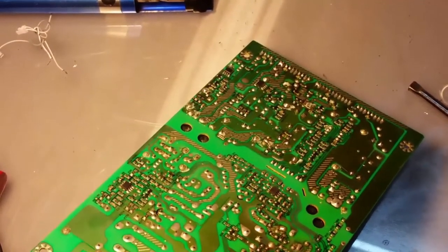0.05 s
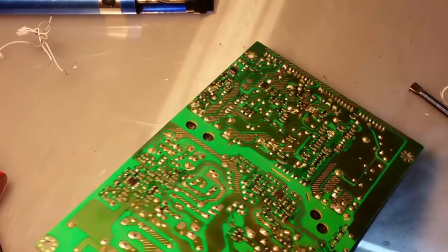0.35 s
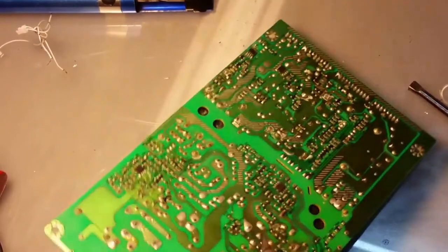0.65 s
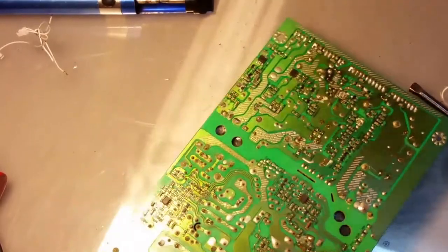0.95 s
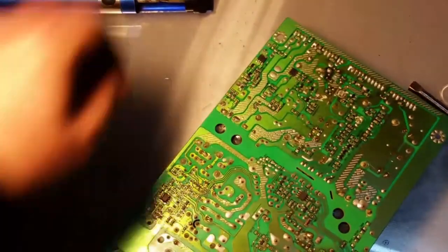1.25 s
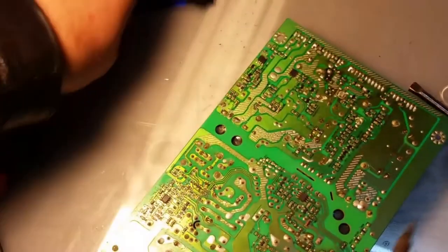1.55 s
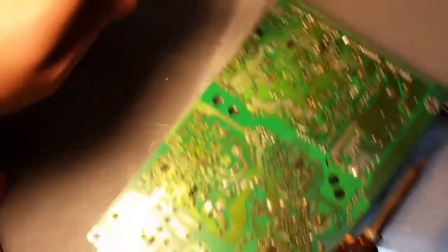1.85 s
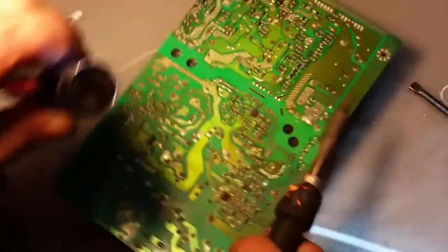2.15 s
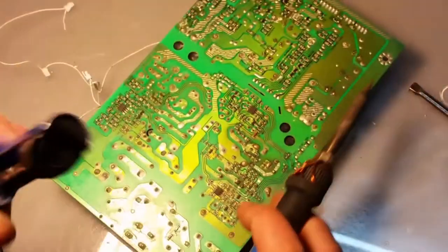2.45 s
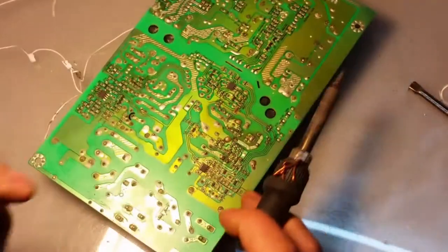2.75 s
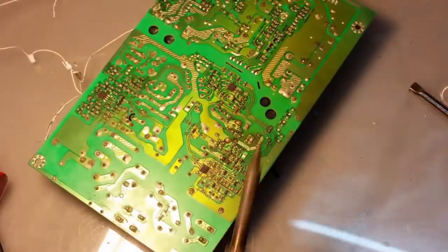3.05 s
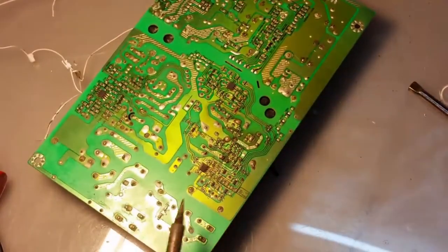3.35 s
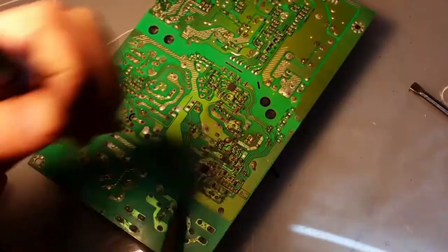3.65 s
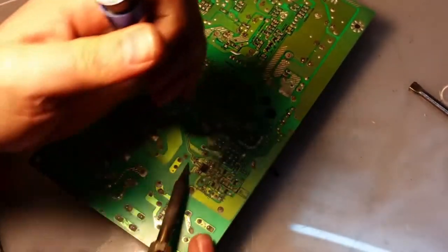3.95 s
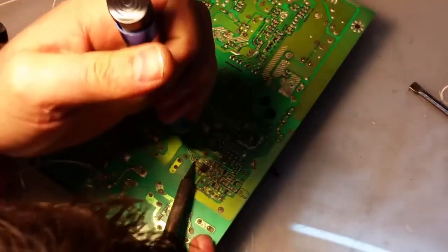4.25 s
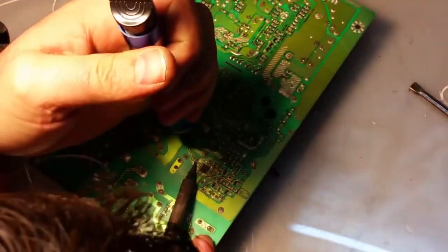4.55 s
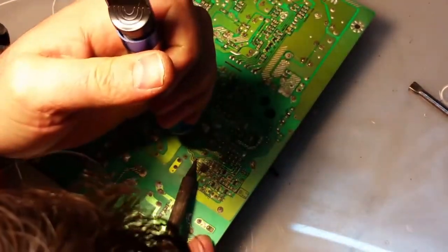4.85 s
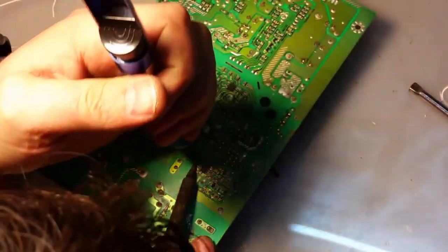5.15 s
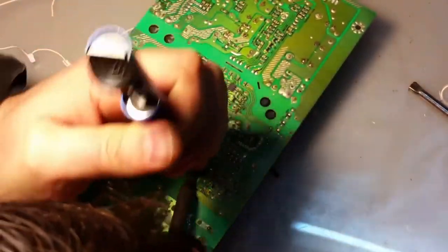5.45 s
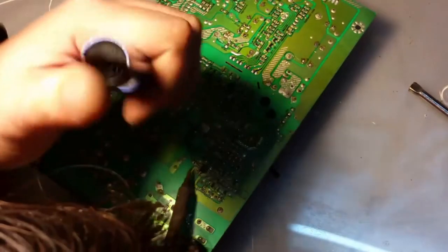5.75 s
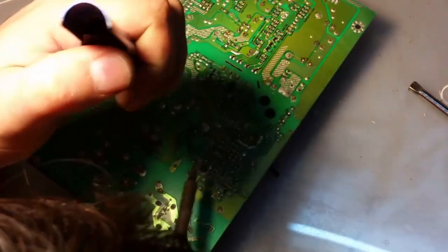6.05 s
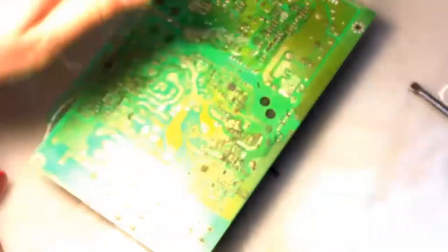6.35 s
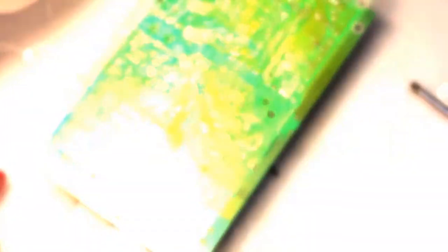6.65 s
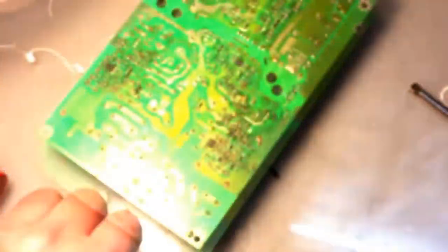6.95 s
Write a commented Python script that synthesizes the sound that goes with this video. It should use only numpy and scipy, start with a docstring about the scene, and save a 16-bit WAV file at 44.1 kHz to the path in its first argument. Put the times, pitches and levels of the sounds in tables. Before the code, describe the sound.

Close up in a small, faintly echoing room, a circuit board is shifted on a bench: light knocks, one loud clatter, more bumps and a juddering drag. Then come crisp metal and plastic clicks from soldering tools, a lull with tiny taps, a quick rattling flurry and a few last snaps. A soft hum and a thin hiss on the left run underneath until everything suddenly dips just before the end.

```python
"""Circuit board on a workbench

A circuit board rocks and drops onto a bench, each impact exciting the damped modes of both. Dragged
round, it scrapes and groans by stick-slip friction. A soldering iron and a desoldering pump tick and
snap against it. A small room reverberates faintly, over a low hum and hiss mainly on the left;
near the end the whole sound dips."""
import sys
import numpy as np
from scipy import signal
from scipy.fft import rfft, irfft, next_fast_len
from scipy.io import wavfile
from scipy.ndimage import uniform_filter1d

SR = 44100
rng = np.random.default_rng(int(sys.argv[2]) if len(sys.argv) > 2 else 0)


def store_pcm(level_fs):
    """Save levels as 16-bit WAV."""
    pcm = np.round(np.clip(level_fs, -1, 1) * 32767).astype(np.int16)
    wavfile.write(sys.argv[1], SR, np.atleast_2d(pcm).T)


N = 318160
TIME = np.arange(N) / SR
AGE = np.arange(SR // 5) / SR  # time since an impact [s]

# rumble and hum together: (time [s], level [dB])
ROOM_LEVEL = [(0, -48.5), (2, -48.5), (3.5, -46.5), (4.6, -51), (5.1, -48.5), (5.8, -46), (6.3, -51.5),
              (6.7, -47.5)]
# tool tip on the board: (time [s], level [dB], main mode [Hz], contact cutoff [Hz])
TOOL_TAPS = [(0.359, -56, 824, 1500), (0.573, -43.5, 965, 1490), (.934, -45, 920, 1210),
             (1.566, -46.5, 1150, 1500), (1.852, -31.5, 1185, 1460), (2.61, -60, 706, 1200),
             (4.061, -44.5, 1485, 1991), (4.283, -57.5, 1480, 1800), (4.462, -54, 1465, 1811),
             (5.699, -37, 1040, 2400), (5.7813, -45, 1070, 2200), (5.794, -52, 1110, 2800)]
# hands and tools brushing the bench: (time [s], level [dB])
BRUSH_LEVEL = [(0, -80.5), (.7, -57.5), (3.3, -60), (4.3, -67.5), (5.3, -83), (5.8, -65), (7.2, -67)]
# board pushed over the bench: (start [s], length [s], level [dB])
BOARD_PUSHES = [(.51, 0.024, -48.5), (1.0, 0.088, -39.5), (1.2, 0.031, -46), (1.43, 0.094, -50),
                (1.86, 0.042, -40.5), (2.0, 0.16, -49.5), (2.61, 0.19, -53), (3.1, 0.066, -45.5)]
# board striking the bench: (time [s], level [dB], contact cutoff [Hz], bench thud [dB],
# rebound gap [s], decay time relative to the free board [ratio])
BOARD_KNOCKS = [(0.5154, -30, 980, -37.5, 0.011, 0.59), (0.572, -37.5, 1460, -53, 0.0018, 0.63),
                (0.623, -44.5, 600, -40.5, 0.02, 0.85), (0.74, -34.5, 1040, -47, 0.00017, 0.92),
                (0.8041, -39, 950, -44, 0, .6), (0.8381, -35, 940, -43, 0.0023, 0.68),
                (0.894, -46, 1240, -48, 0.00026, 0.63), (0.9335, -36.5, 950, -61, 0.00031, 0.5),
                (0.9983, -16.5, 1440, -33, 0.00041, 1.06), (1.0099, -16.5, 1550, -26.5, 0.00029, .9),
                (1.0282, -22.5, 1200, -25, 0.00038, 0.49), (1.054, -27, 1520, -39, 0.01, 0.73),
                (1.0953, -26, 1300, -38, 0.0006, 0.54), (1.131, -40.5, 800, -48, 0, .5),
                (1.169, -32.5, 1198, -44, 0.00014, .5), (1.414, -37, 375, -66, 0.0013, 0.69),
                (1.4255, -29, 595, -43, 0.00074, 1.13), (1.4482, -34, 520, -40, 0.012, 0.84),
                (1.5564, -38, 623, -34, 0.0088, 0.42), (1.7044, -38.5, 476, -52, 0.0017, 0.62),
                (1.8439, -34.5, 1413, -45, 0.00094, 0.88), (1.865, -25.5, 849.6, -29.5, 0.0019, 0.93),
                (1.887, -35, 950, -32.5, 0, .8), (3.1027, -30, 520, -38.5, 0.00015, 0.52),
                (5.4596, -35, 900, -41, 0.002, .25), (5.4787, -38, 1699, -38.5, 0.00048, .3),
                (5.6079, -42.5, 700, -38.5, 0.00086, 0.71), (6.4054, -36, 1199, -43.5, 0, 0.22)]
# one gritty rub, then two faint high hisses that each swell up to a snap:
# (start [s], end [s], final level [dB], centre [Hz], bandwidth [Hz])
NOISE_SWELLS = [(0.954, 1.018, -44.5, 1390, 400), (3.206, 3.333, -54.5, 12650, 5500),
                (5.913, 6.041, -52.5, 12800, 5500)]
# metal and plastic snaps: (time [s], level [dB], rattle t60 [s], rebound gap [s],
# body relative to treble [dB], main mode [Hz], relative ring level [dB])
TOOL_SNAPS = [(.9979, -32, 0.064, 0.015, 4, 3500, -6), (1.0279, -34, .07, 0.000059, 4, 3400, -16),
              (1.057, -38, 0.15, 0.00033, 6.5, 3060, -10), (1.1934, -41.5, 0.12, 0.01, 3, 3380, -12),
              (1.851, -47, 0.072, 0.014, 2, 3487, 0.5), (3.1485, -37, 0.045, 0, 0.5, 3550, -12),
              (3.3383, -20.5, 0.013, 0, 0.5, 3250, -14), (3.4275, -37, 0.023, 0.0009, 11.5, 3500, -23),
              (5.466, -31.5, 0.067, 0.00023, -4.5, 3720, -16.5), (5.4715, -22, 0.032, 0, -1.5, 3470, -24),
              (5.4783, -30, 0.045, 0, 4.5, 3770, -23), (5.4875, -28, 0.068, 0, 3.5, 4600, -24),
              (5.518, -32, 0.024, 0.0041, 2.5, 3450, -25.5),
              (5.6682, -38, 0.024, 0.0036, -3.5, 3470, -15.5), (5.7698, -34, 0.052, 0.0019, 2.5, 3460, -14),
              (5.796, -42, 0.032, 0, 9.5, 3093, -15), (5.83, -42.5, 0.034, 0.00037, 3, 3540, -15),
              (5.844, -30, 0.045, 0, 1.5, 3476, -22.5), (6.0434, -17, 0.013, 0, 1, 3694, -14.5),
              (6.1348, -40, 0.046, 0.0016, 10, 3496, -8), (6.3963, -23.5, 0.067, 0.0012, -5, 3621, -22),
              (6.407, -25, 0.051, 0.0034, 5, 3504, -23)]
# hand landing on bench or board: (start [s], length [s], level [dB])
HAND_SCUFFS = [(1.866, .015, -41), (3.105, .06, -37), (3.19, .16, -51), (5.479, .012, -43.5),
               (6.407, .008, -39.5), (6.45, 0.043, -52)]
# board's edge sliding without catching: (start [s], length [s], level [dB])
EDGE_SLIDES = [(1.99, .13, -46), (2.13, 0.11, -43), (2.6, 0.22, -48.5)]
# board's edge gripping: (start [s], length [s], level [dB], slip rate [Hz], relative grit level [dB])
EDGE_GRIPS = [(2.116, 0.018, -40, 392, -12), (2.154, 0.02, -31.5, 386.4, -16),
              (2.185, 0.011, -30, 404, -17.5), (2.212, 0.036, -37.5, 397.1, -19.5),
              (2.691, 0.035, -33.5, 393.2, -28), (2.738, 0.027, -37, 383.3, -26),
              (2.777, 0.034, -34.5, 395.2, -32)]

# modes of the free board, bench top and thin metal parts: (frequency [Hz], gain [dB], t60 [s])
BOARD_MODES = [(170, -18, 0.04), (233, -4, 0.087), (269, -7, 0.04), (305, -6, 0.15), (392, -10.5, 0.07),
               (427, -1.5, 0.06), (497, 3, 0.056), (590, -9.5, .045), (677, -10, 0.053), (745, -16, 0.06),
               (890, -19.5, 0.03), (1130, -8.5, 0.035), (1350, -26, 0.017), (1720, -22, 0.03)]
BENCH_MODES = [(48, -14.5, 0.1), (80.1, -2.5, 0.21), (102, -7.5, 0.11), (123, -6, 0.15), (160, -13, 0.1)]
METAL_MODES = [(9730, -6.5, .16), (13297, -1, .13), (13620, -2, .13), (13944, 0.5, .13)]
# modes of the tapped board and tool bodies: (frequency over main mode [ratio], gain [dB], t60 [s])
TAP_MODES = [(.56, -9, 0.014), (.74, -11, .012), (1, -2, 0.018), (1.15, -11.5, 0.012), (1.55, -9.5, 0.007)]
TOOL_MODES = [(.7, -11, .03), (.87, -8.5, 0.032), (.95, -7, 0.03), (1.01, 0.5, 0.024), (1.14, -3, .018)]

# spectral envelopes of the noises: (frequency [Hz], gain [dB])
RUMBLE_SPECTRUM = [(15, -16.5), (28, -12), (43, -8.5), (57, -4.5), (76, 2.5), (100, -4.5), (135, -6),
                   (165, -20), (240, -15.5), (420, -26.5), (700, -33.5), (1200, -40), (1520, -32),
                   (2100, -43), (16000, -64)]
HISS_SPECTRUM = [(2000, -35), (2750, -24), (3030, -10.5), (3300, 1), (3700, 2.5), (4200, -2.5), (4700, -12),
                 (5300, -32), (6600, -46), (7300, -21.5), (7800, -20.5), (9000, -34.5), (10400, -49.5),
                 (11500, -23.5), (13200, -34.5), (16000, -50.5)]
SCRAPE_SPECTRUM = [(60, -16), (150, -11.5), (280, 0), (450, -3.5), (650, -12), (1150, -16), (1800, -27.5),
                   (3000, -27.5), (8000, -46.5), (12500, -29), (16000, -63.5)]
CHATTER_SPECTRUM = [(60, -36.5), (200, 0), (450, 3.5), (800, -4.5), (1150, -10), (1700, -13.5),
                    (2500, -16.5), (5000, -12), (16000, -44)]
SNAP_SPECTRUM = [(150, -18.5), (400, -8.5), (900, -8), (3400, -9), (8000, -9.5), (10500, 0), (12500, 2),
                 (13800, 11.5), (16000, -7)]
SCUFF_SPECTRUM = [(50, -12), (110, 3.5), (340, 2), (470, -11), (620, -7), (1300, -32.5), (4000, -52.5)]
EDGE_SPECTRUM = [(150, -35), (330, -3), (400, 1.5), (455, 0.5), (540, -22), (1150, -23), (1400, -33),
                 (4000, -49.5)]
GRIT_SPECTRUM = [(300, -10), (680, 9), (1100, 8), (1350, -17), (1900, -11), (4000, -18), (16000, -56)]


def undb(db):
    """Amplitude ratio of a level in decibels."""
    return 10 ** (np.asarray(db) / 20)


def unit(x):
    """Normalisation to unit rms."""
    return x / np.sqrt(np.mean(x ** 2) + 1e-18)


def unit_onset(x, seconds):
    """Normalisation to unit rms over the start of a transient."""
    return x / np.sqrt(np.mean(x[:int(seconds * SR)] ** 2))


def envelope(rows):
    """Amplitude from linear interpolation of (time, level) rows."""
    return undb(np.interp(TIME, *np.transpose(rows)))


def colour(x, spectrum):
    """Minimum-phase filtering: folding the cepstrum makes the response causal."""
    size = next_fast_len(x.shape[-1] + 2048)
    size += size % 2
    hz, db = np.transpose(spectrum)
    bin_hz = np.arange(size // 2 + 1) * SR / size
    cepstrum = irfft(np.log(undb(np.interp(np.log(bin_hz + 1), np.log(hz), db))))
    cepstrum[1:size // 2] *= 2
    cepstrum[size // 2 + 1:] = 0
    return irfft(rfft(x, size) * np.exp(rfft(cepstrum)))[..., :x.shape[-1]]


def lowpass(x, hz, order=2):
    """Maximally flat low-pass filtering."""
    return signal.sosfilt(signal.butter(order, hz, fs=SR, output="sos"), x)


def noise(spectrum):
    """Spectrally shaped noise of unit rms."""
    return unit(colour(rng.standard_normal(N), spectrum))


def wander(rate_hz):
    """Smooth random modulation of unit rms."""
    hold = int(SR / rate_hz)
    steps = np.repeat(rng.standard_normal(N // hold + 1), hold)
    return unit(uniform_filter1d(steps, hold)[:N])


def decay(t60):
    """Exponential damping, 60 dB in t60 seconds."""
    return np.exp(-np.log(1000) * AGE / t60)


def ring(modes, scatter_db, detune):
    """Modal superposition: each blow lands elsewhere and weights the damped modes anew."""
    draws = rng.standard_normal((len(modes), 2))
    return sum((-1) ** k * undb(db + scatter_db * a) * decay(t60)
               * np.sin(2 * np.pi * hz * (1 + detune * b) * AGE)
               for k, ((hz, db, t60), (a, b)) in enumerate(zip(modes, draws)))


def bounces(start, gap, loss_db=-6, shrink=0.76):
    """Inelastic collision, as (time, level): a gap over 3 ms gives two ever weaker, quicker rebounds."""
    if gap <= 0.003:
        return [(start, 0)]
    return [(start, 0), (start + gap, loss_db), (start + gap + gap * shrink, 2 * loss_db)]


def strokes(rows, attack_s, release_s):
    """Exponential envelopes: each stroke swells up to its start, holds and dies away."""
    return np.max([undb(db) * np.exp(np.minimum(TIME - start, 0) / attack_s
                                     - np.maximum(TIME - start - length, 0) / release_s)
                   for start, length, db in rows], axis=0)


def add(track, start, x):
    """Superposition of an event on a track."""
    i = int(start * SR)
    track[i:i + len(x)] += x[:N - i]


def place(x, left_db, room_db, t60, bright_hz):
    """Direct sound plus a diffuse field, which is more alike in both channels in the bass."""
    t = np.arange(2 * len(AGE)) / SR
    tail = rng.standard_normal((2, len(t))) * np.exp(-np.log(1000) * t / t60) * (1 - np.exp(-t / 0.0021))
    tail += lowpass(tail[::-1] - tail, 200, order=1) / 2
    tail /= np.sqrt(np.sum(tail ** 2, axis=1, keepdims=True))
    diffuse = signal.fftconvolve(x[None], lowpass(tail, bright_hz, order=1), axes=1)[:, :N]
    return (x + undb(room_db) * diffuse) * undb([[left_db / 2], [-left_db / 2]])


def room_tone():
    """Ambient rumble, coherent between the channels in the bass, with two wavering hum tones."""
    mid, side = noise(RUMBLE_SPECTRUM), noise(RUMBLE_SPECTRUM)
    side = signal.sosfilt(signal.butter(1, 400, "high", fs=SR, output="sos"), side)
    hum = np.sin(2 * np.pi * np.cumsum(43 + 1.1 * wander(13)) / SR) * undb(-2.5 + 2 * wander(2.4))
    hum += undb(-15) * np.sin(2 * np.pi * np.cumsum(139 + 2 * wander(8)) / SR)
    return unit(np.array([mid + side, mid - side]) + hum) * envelope(ROOM_LEVEL)


def electronic_hiss():
    """Electronic noise: a band mainly in the left channel, above a flat floor."""
    band = noise(HISS_SPECTRUM) * undb([[-46], [-70]])
    floor = undb(-76) * rng.standard_normal((2, N))
    return lowpass(band + floor, 12550, order=12)


def taps():
    """Point excitation by a tool tip: the spot sets the board's modes, the contact their brightness."""
    out = np.zeros(N)
    for start, db, main_hz, contact_hz in TOOL_TAPS:
        modes = [(main_hz * ratio, gain_db, t60) for ratio, gain_db, t60 in TAP_MODES]
        clack = unit_onset(rng.standard_normal(len(AGE)) * decay(0.0065), 0.0033)
        ringing = unit_onset(ring(modes, scatter_db=2.5, detune=0.011), 0.0069)
        tap = lowpass(ringing + undb(4) * clack, contact_hz, order=5)
        add(out, start, undb(db) * unit_onset(tap, 0.004))
    return place(out, left_db=1, room_db=-4, t60=0.14, bright_hz=5040)


def scrape():
    """Sliding friction: the board scrapes unevenly at each push; hands brush faintly in between."""
    grains = rng.standard_normal(N) * undb(4.4 * wander(70))
    pushes = strokes(BOARD_PUSHES, attack_s=0.021, release_s=0.086)
    friction = unit(colour(grains, SCRAPE_SPECTRUM)) * np.hypot(pushes, envelope(BRUSH_LEVEL))
    return place(friction, left_db=2.5, room_db=-1, t60=0.2, bright_hz=4000)


def knocks():
    """Impact excitation of board and bench: softer contact dulls the board's ring, a hand damps it."""
    board, bench = np.zeros(N), np.zeros(N)
    for start, db, contact_hz, thud_db, gap, decay_ratio in BOARD_KNOCKS:
        modes = [(hz, gain_db, t60 * decay_ratio) for hz, gain_db, t60 in BOARD_MODES]
        for time, loss_db in bounces(start, gap):
            # the parts on the board chatter briefly after the impulse
            chatter = undb(-16.5) * rng.standard_normal(len(AGE)) * decay(0.057 * decay_ratio)
            contact = unit_onset(colour((AGE == 0) + chatter, CHATTER_SPECTRUM), 0.013)
            ringing = unit_onset(ring(modes, scatter_db=5.5, detune=0.02), 0.003)
            blow = lowpass(contact + ringing, contact_hz, order=3)
            thud = ring(BENCH_MODES, scatter_db=3, detune=0.05)
            add(board, time, undb(db + loss_db) * unit_onset(blow, 0.0055))
            add(bench, time, undb(thud_db + loss_db) * unit_onset(thud, 0.025))
    return (place(board, left_db=3.5, room_db=-5.5, t60=0.34, bright_hz=6000)
            + place(bench, left_db=-1, room_db=-7, t60=0.4, bright_hz=903))


def swells():
    """Band noise under a linear ramp: one gritty rub, then faint high hisses swelling up to a snap."""
    out = np.zeros(N)
    for start, end, db, hz, width in NOISE_SWELLS:
        size = int((end - start) * SR)
        grains = rng.standard_normal(size) * undb(2.2 * rng.exponential(size=size))
        band = signal.butter(2, [hz - width / 2, hz + width / 2], "band", fs=SR, output="sos")
        ramp = np.linspace(0.15, 1, size)
        add(out, start, undb(db) * unit(signal.sosfilt(band, grains)) * ramp)
    return place(out, left_db=9.5, room_db=-5.5, t60=0.28, bright_hz=12000)


def snaps(strike_db=19.5, rattle_db=5.5, shimmer_db=-27, body_hz=6460):
    """Hard contact gives a broadband crack and rattle, and rings the tool and its thin metal parts."""
    out = np.zeros(N)
    for start, db, rattle_t60, gap, body_db, main_hz, ring_db in TOOL_SNAPS:
        modes = [(main_hz * ratio, gain_db, t60) for ratio, gain_db, t60 in TOOL_MODES]
        shelf = [(body_hz, body_db), (2 * body_hz, 0)]
        for time, loss_db in bounces(start, gap):
            ragged = undb(4 * np.repeat(rng.standard_normal(len(AGE)), 40)[:len(AGE)])
            rattle = undb(rattle_db) * ragged * decay(rattle_t60)
            grit = rng.standard_normal(len(AGE)) * (decay(0.0053) + rattle)
            contact = colour(grit + undb(strike_db) * (AGE == 0), SNAP_SPECTRUM)
            crack = unit_onset(colour(contact, shelf), 0.0018)
            ping = undb(ring_db) * unit_onset(ring(modes, scatter_db=1.5, detune=0.002), 0.0011)
            shimmer = undb(shimmer_db) * unit_onset(ring(METAL_MODES, scatter_db=4, detune=0.012), 0.004)
            add(out, time, undb(db + loss_db) * (crack + ping + shimmer))
    left, right = place(out, left_db=4, room_db=-2.5, t60=0.36, bright_hz=13500)
    return np.array([left, np.roll(right, 1)])  # the path to the right is slightly longer


def scuffs():
    """Soft contact: the side of a hand lands and slides, a dull thump without ringing."""
    pressure = strokes(HAND_SCUFFS, attack_s=0.003, release_s=0.025)
    return place(noise(SCUFF_SPECTRUM) * pressure, left_db=1.5, room_db=-6.5, t60=0.3, bright_hz=3000)


def groan(slip_hz_per_db=1.5):
    """Stick-slip oscillation of the board's edge, slower under a weaker grip, amid sliding noise."""
    rows = np.array(EDGE_GRIPS)
    grip = strokes(rows[:, :3], attack_s=0.0045, release_s=0.03)
    hold_times = np.sort(np.ravel([rows[:, 0], rows[:, 0] + rows[:, 1]]))
    full_db, full_hz, grit_db = (np.interp(TIME, hold_times, np.repeat(col, 2)) for col in rows.T[2:])
    eased_db = 20 * np.log10(np.clip(grip / undb(full_db), 0.1, 1))
    slip_hz = (full_hz + slip_hz_per_db * eased_db) * (1 + 0.014 * wander(200))
    phase = 2 * np.pi * np.cumsum(slip_hz) / SR
    overtones = sum(undb(db + 2 * wander(60)) * np.sin(k * phase + 0.3 * wander(150))
                    for k, db in enumerate([-22, -21, -38], 2))
    grit = noise(GRIT_SPECTRUM) * (1 + np.sin(phase))  # one burst per slip
    judder = (unit(np.sin(phase) + overtones) + undb(grit_db) * grit) * grip * undb(1.2 * wander(110))
    sliding = strokes(EDGE_SLIDES, attack_s=0.01, release_s=0.047)
    rubbing = noise(EDGE_SPECTRUM) * sliding * undb(2.1 * wander(90))
    return place(judder + rubbing, left_db=6, room_db=-13, t60=0.57, bright_hz=4000)


def dip(sound, hiss, start_s=6.68, fall_s=0.0083, depth_db=-26.5, recover_s=0.22):
    """Sudden attenuation: everything drops away, and only the bass and a faint hiss creep back."""
    age = np.maximum(TIME - start_s, 0)
    crossfade = np.clip(age / fall_s, 0, 1)
    bass = lowpass(sound - lowpass(sound, 110, order=1), 183)
    muffled = undb(4.5) * bass + undb(-17.5) * lowpass(hiss, 4300)
    recovery = undb(depth_db * np.exp(-age / recover_s))
    return (1 - crossfade) * (sound + hiss) + crossfade * recovery * muffled


def scene():
    """Linear superposition of all sources, dipping near the end."""
    room, hiss = room_tone(), electronic_hiss()
    sound = knocks() + snaps() + taps() + swells() + scrape() + scuffs() + groan() + room
    return dip(sound, hiss)


def record(dry):
    """Band limiting: a steep low-pass removes the treble above 16.2 kHz."""
    return signal.sosfilt(signal.ellip(8, 0.2, 70, 16200, fs=SR, output="sos"), dry)


dry = scene()
out = record(dry)
store_pcm(out)
```